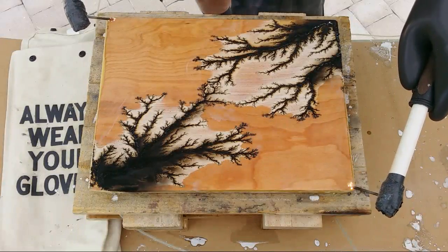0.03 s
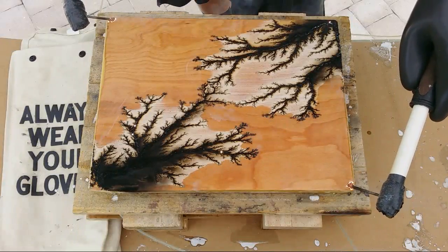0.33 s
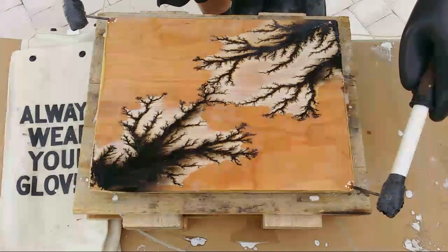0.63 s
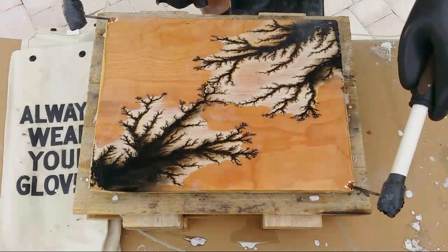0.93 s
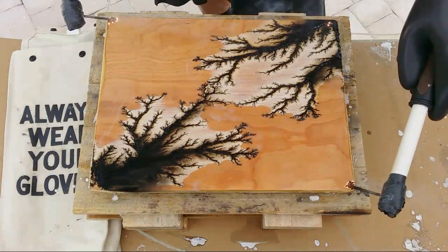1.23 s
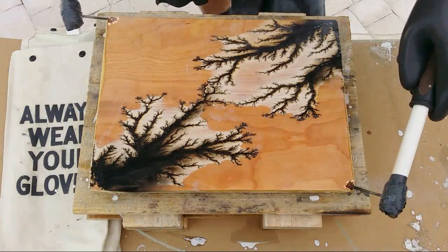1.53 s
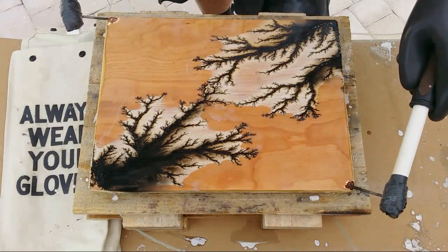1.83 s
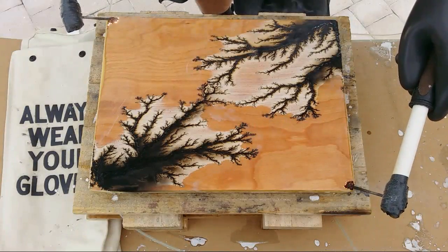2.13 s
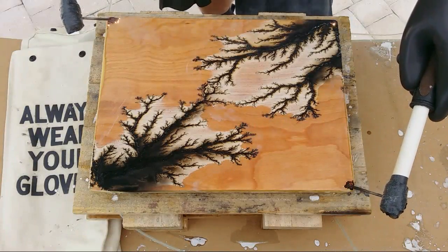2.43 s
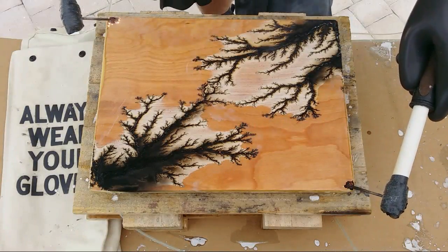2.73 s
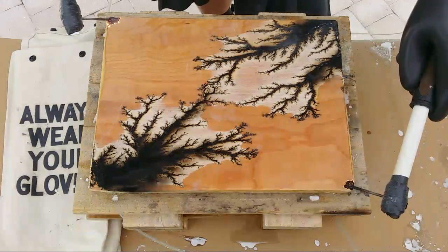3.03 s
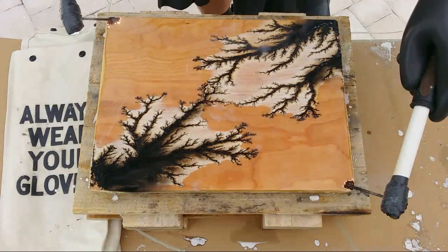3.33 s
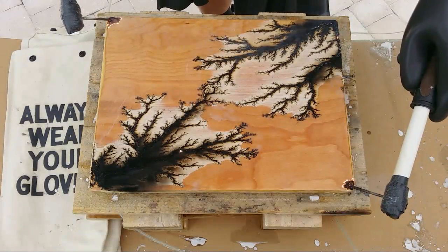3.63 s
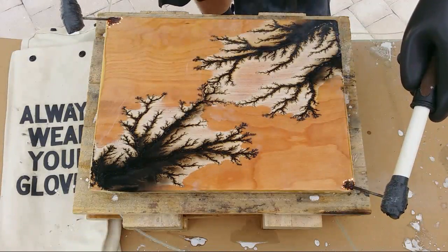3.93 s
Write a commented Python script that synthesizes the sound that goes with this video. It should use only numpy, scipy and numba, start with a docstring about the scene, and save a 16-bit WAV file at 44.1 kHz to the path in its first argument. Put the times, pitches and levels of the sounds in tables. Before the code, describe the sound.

A dense, bright, buzzing sizzle of electricity burning wood runs throughout, close by outdoors. It is loudest in the first 0.3 seconds, with flares, two sharp cracks and a brief hollow sweep. It eases around 2.5 seconds, then recovers slightly. Lone cracks come near 0.8, 2.3, 3.1 and 3.9 seconds. Underneath are a soft fan-like rush and a low transformer hum, which drops near 3 seconds after another hollow sweep.

```python
"""Outdoors near a wall, high voltage burns branching tracks into a damp plywood board close by.
Tiny sparks crowd into every half cycle of the mains, one direction of the current stronger than the
other, and make a bright buzzing sizzle with a few flares and cracks. The transformer hums at twice
the mains rate over a steady rush like that of a fan. Twice a hollow dip sweeps through the sound."""
import sys
import numpy as np
from scipy import signal
from scipy.fft import rfft, irfft
from scipy.io import wavfile
from scipy.ndimage import uniform_filter1d
from numba import njit

SR = 44100
rng = np.random.default_rng(int(sys.argv[2]) if len(sys.argv) > 2 else 0)


def wav_out(sig):
    """Save sig, one row per channel (or a flat mono array), as 16-bit PCM at SR to the path in sys.argv[1]."""
    wavfile.write(sys.argv[1], SR, np.round(np.clip(np.atleast_2d(sig).T, -1, 1) * 32767).astype(np.int16))


N = 176400

MAINS_HZ = 60
SPARKS_PER_S, SPARK_SPREAD_DB = 32000, 2.5
# The bright tone of the sparks. Each row: frequency in Hz, gain in dB.
SPARK_TONE = [(300, -27.5), (1500, -24), (3000, -22), (4300, -23.5), (5500, -17.5), (6300, -17.5),
              (7500, -12.5), (8400, -4.5), (9550, -0.5), (10300, -4), (11200, -7.5), (12200, -8.5),
              (13100, -9.5), (16500, -8.5)]


def undb(db):
    """Turn decibels into a factor to multiply by."""
    return 10 ** (np.asarray(db) / 20)


def unit(x):
    """Scale a signal to an average (rms) level of 1."""
    return x / np.sqrt(np.mean(x ** 2))


def curve(table, column=1):
    """Join one column of a time table with straight lines, one value per sample."""
    rows = np.array(table, float)
    return np.interp(np.arange(N) / SR, rows[:, 0], rows[:, column])


def colour(x, tone):
    """Filter a sound so that it takes on the given tone (rows of Hz and dB)."""
    rows, size = np.array(tone, float), 2 * N
    hz = np.maximum(np.arange(N + 1) * SR / size, 1)
    gain_db = np.interp(np.log(hz), np.log(rows[:, 0]), rows[:, 1])
    # Folding the cepstrum makes the filter ring only after a click, never before it.
    cepstrum = irfft(np.log(undb(gain_db)))
    cepstrum[1:N] *= 2
    cepstrum[N + 1:] = 0
    return irfft(rfft(x, size) * np.exp(rfft(cepstrum)))[:N]


def waver(per_s):
    """A smooth random wobble of size about 1, with per_s new values a second."""
    hold = max(int(SR / per_s), 1)
    steps = np.repeat(rng.standard_normal(N // hold + 1), hold)
    return unit(uniform_filter1d(uniform_filter1d(steps, hold), hold)[:N])


@njit
def bandpass(x, hz, width_hz):
    """Keep only the sound near hz; the centre and width may change with every sample."""
    y, band, low = np.empty(len(x)), 0., 0.
    for i in range(len(x)):
        tuning, damping = np.tan(np.pi * hz[i] / SR), width_hz[i] / hz[i]
        ring = (band + tuning * (x[i] - low)) / (1 + tuning * (tuning + damping))
        band, low = 2 * ring - band, low + 2 * tuning * ring
        y[i] = damping * ring
    return y


def echoed(x, echoes):
    """A sound plus the later, quieter copies that surfaces throw back."""
    at = np.arange(N)
    return x + sum(undb(db) * np.interp(at - np.round(ms / 1000 * SR), at, x, left=0)
                   for ms, db in echoes)


def drone(hz, width_hz):
    """A narrow band of noise becomes a tone whose pitch and strength waver quickly."""
    band = bandpass(rng.standard_normal(N), np.full(N, float(hz)), np.full(N, float(width_hz)))
    tone = np.cos(np.angle(signal.hilbert(band)))
    return unit(tone * undb(2.2 * waver(per_s=2 * width_hz)))


def fan():
    """An airy rush with a rumble, a whirr and throbbing drones; the bass drops late on."""
    # The tones of the rush and the rumble. Each row: frequency in Hz, gain in dB.
    rush_tone = [(22, -35), (38, -28), (55, -7.5), (100, -5), (200, -5), (280, -3.5), (400, 0), (560, -5),
                 (660, -2), (750, -3), (930, -5), (1050, -4), (1500, -5), (2200, -7), (3200, -10.5),
                 (4500, -13), (8000, -17.5), (16000, -49)]
    rumble_tone = [(22, -50), (38, -31), (52, -6), (72, 0.5), (95, -6), (140, -0.5), (175, 6.5),
                   (210, -2.5), (250, 2), (290, -4.5), (400, 0.5), (560, -7.5), (1000, -13), (2500, -24.5)]
    # Reflections of the rush. Each row: delay in milliseconds, gain in dB.
    echoes = [(5.3, -22), (8.9, -15)]
    # How the bass and the throb rise and fall. Each row: time in seconds, level change in dB.
    bass_changes = [(0, -20), (.04, -15), (.1, -2), (.45, 1), (1.1, -1), (1.48, 2), (1.65, -5), (1.88, 4.5),
                    (2.1, 1), (2.39, 4), (2.5, 0), (2.8, 5.5), (2.88, 4.5), (2.96, -11.5), (4, -9.5)]
    throb_changes = [(0, -7.5), (.22, 4), (.29, -1), (.36, 4.5), (.57, -1), (.65, 4), (.82, -1),
                     (.91, -6.5), (1.1, 5.5), (1.2, -5.5), (1.6, 1.5), (1.8, -1), (1.92, 3.5), (2.05, -7),
                     (2.12, 1), (2.19, -8), (2.27, 5), (2.35, -10), (2.48, 1), (2.58, -9), (2.67, 2.5),
                     (2.8, -7), (3.15, -5), (3.45, -6), (3.75, 3), (4, -3)]
    # How loud the whirr is. Each row: time in seconds, level in dB.
    whirr_levels = [(0, -51), (.3, -48.5), (.65, -46), (1, -50.5), (1.5, -46), (1.95, -50.5), (2.2, -45.5),
                    (2.6, -49.5), (3.05, -52), (3.17, -46), (3.5, -52), (3.78, -49), (3.95, -44.5)]
    # Each row: a drone's pitch in Hz, width in Hz, base level in dB, then how closely it follows
    # the bass and the throb, each from 0 to 1.
    resonances = [(337.2, 14, -44.5, 0.5, 0.86), (362.5, 16, -50, 0.5, 0.9), (479, 10, -56.5, .4, 0.1),
                  (818, 14, -55, .1, 0.1), (1150, 22, -56, 0, 0.1)]
    bass_db, throb_db = curve(bass_changes), curve(throb_changes)
    air = unit(echoed(colour(rng.standard_normal(N), rush_tone), echoes))
    rush = air * undb(-38.5 + .53 * waver(per_s=6.17))
    rumble = unit(colour(rng.standard_normal(N), rumble_tone)) * undb(-45 + bass_db)
    whirr = undb(curve(whirr_levels)) * drone(hz=722, width_hz=30)
    drones = sum(undb(db + bass_share * bass_db + throb_share * throb_db) * drone(hz, width_hz)
                 for hz, width_hz, db, bass_share, throb_share in resonances)
    return rush + rumble + whirr + drones


def transformer():
    """The core hums at twice the mains rate, with weaker wavering tones above."""
    # How loud the hum is. Each row: time in seconds, level in dB.
    hum_levels = [(0, -45), (.035, -45), (.09, -37), (.23, -34.5), (.33, -38.5), (.48, -37), (.7, -39.5),
                  (.9, -39), (1.1, -37), (1.2, -41), (1.33, -39.5), (1.55, -38.5), (1.85, -41), (2.1, -41),
                  (2.2, -42.5), (2.5, -42), (2.6, -40.5), (2.72, -45.5), (2.85, -40.5), (2.93, -48.5),
                  (3.35, -49), (3.7, -45.5), (4, -47.5)]
    # The tones in the hum. Each row: multiple of the mains rate, relative level in dB.
    harmonics = [(2, 0), (3, -21), (4, -16), (6, -13.5)]
    phase = 2 * np.pi * MAINS_HZ * np.arange(N) / SR
    hum = np.zeros(N)
    for multiple, db in harmonics:
        strength = undb(db + .6 * waver(per_s=16))
        hum += strength * np.sin(multiple * phase + 2 * np.pi * rng.random())
    return np.sqrt(2) * hum * undb(curve(hum_levels))


def yard(sound):
    """The wall and nearby surfaces return echoes; the rest of the yard scatters a short, soft tail."""
    # Each row: an echo's delay in milliseconds, gain in dB.
    echoes = [(6.68, -25), (7.76, -17.5), (10.15, -24)]
    tail_db, fade_s = -10, .12  # the tail falls by 60 dB in fade_s
    t = np.arange(SR // 5) / SR
    tail = rng.standard_normal(len(t)) * np.exp(-np.log(1000) * t / fade_s)
    scattered = signal.fftconvolve(sound, tail / np.linalg.norm(tail))[:N]
    return echoed(sound, echoes) + undb(tail_db) * scattered


def sparks(per_s, spread_db):
    """Each spark is one click at a random moment; many are small and a few are larger."""
    happens = rng.random(N) < per_s / SR
    size = undb(spread_db * np.minimum(rng.exponential(size=N), 5))
    return unit(happens * size * np.sign(rng.standard_normal(N)))


def flares():
    """The arc jumps harder on some voltage peaks, giving short, dense showers of sparks."""
    # Each row: a flare's middle in seconds, level in dB.
    showers = [(.0237, -14.5), (.0398, -20), (.0561, -13), (.0735, -23), (0.0903, -17), (0.1071, -17),
               (0.1402, -20), (0.173, -16), (0.2225, -21), (.2562, -22), (0.2731, -19), (.3397, -23),
               (.5735, -24), (.6729, -24), (.7726, -23), (.9733, -23), (1.1562, -23), (1.3903, -25),
               (1.7074, -24), (1.7402, -26), (2.2826, -26), (2.2993, -24.5), (2.3825, -28), (2.399, -27),
               (2.4156, -23.5), (2.5989, -30), (3.04, -25), (3.0909, -25), (3.425, -23), (3.925, -22)]
    # Flares have more body than the sizzle. Each row: frequency in Hz, gain in dB.
    flare_tone = [(300, -17.5), (1200, -12.5), (3000, -15.5), (4500, -17.5), (6300, -15.5), (7500, -9),
                  (8400, -3.5), (9500, 4), (11000, -8.5), (13000, -8.5), (16500, -9.5)]
    t, width_ms = np.arange(N) / SR, .75
    swell = sum(undb(db) * np.exp(-.5 * ((t - at) * 1000 / width_ms) ** 2) for at, db in showers)
    return swell * unit(colour(sparks(SPARKS_PER_S, SPARK_SPREAD_DB), flare_tone))


def cracks():
    """Lone loud sparks, each one sharp click with the tone of the sizzle."""
    # Each row: a crack's start in seconds, peak level in dB.
    lone_sparks = [(.0242, -7), (0.107, -4), (.8052, -13), (2.316, -17), (2.4158, -18), (3.0401, -18),
                   (3.1909, -17), (3.8572, -8), (3.9252, -14.5)]
    hits = np.zeros(N)
    for at, db in lone_sparks:
        hits[int(at * SR)] = undb(db)
    click_peak = np.abs(colour(signal.unit_impulse(N), SPARK_TONE)).max()
    return colour(hits, SPARK_TONE) / click_peak


def bursts(delay_ms, fall_ms):
    """Spark power for one direction of the current: one slightly uneven swell per mains cycle."""
    jitter_ms, spread_db = .15, .74
    cycles = (np.arange(N) / SR - delay_ms / 1000) * MAINS_HZ
    nearest = np.round(cycles).astype(int)
    chance = rng.standard_normal((N // 100, 2))[nearest + 2]  # two random numbers per cycle
    from_peak_ms = (cycles - nearest) / MAINS_HZ * 1000 + jitter_ms * chance[:, 0]
    width_ms = fall_ms * np.where(from_peak_ms < 0, .58, 1)  # it rises faster than it falls
    swell = np.exp(-.5 * (from_peak_ms / width_ms) ** 2)
    return swell * undb(spread_db * chance[:, 1]) ** 2


def arc():
    """Sizzling sparks and sharper snaps crowd around the voltage peaks, joined by flares and cracks."""
    # The arc's strength. Each row: time in seconds, base level in dB, lead in dB of the usually
    # stronger direction of the current over the other.
    strength = [(0, -23, 0), (.05, -23, 3.5), (.19, -23, 1), (.33, -27.5, 2), (.45, -27, -2),
                (.66, -26.5, 1), (1, -27.5, 1.5), (1.25, -27.7, 4.5), (1.45, -29, 0), (1.66, -28.5, 1.5),
                (1.74, -28.5, 5), (1.85, -29, 2.5), (2.1, -29.9, 2), (2.22, -32, 0), (2.3, -29.5, 1),
                (2.46, -33.5, -2.5), (2.74, -33.5, 1), (2.82, -32.3, 3), (3, -31, 0), (3.08, -31.5, 2),
                (3.45, -29.5, 2), (3.7, -29, 2), (4, -30, 2.5)]
    # When the strong burst peaks in the mains cycle. Each row: time in seconds, delay in milliseconds.
    burst_delays = [(0, 6.1), (.2, 6), (.45, 5.8), (1.5, 6.4), (2.1, 7.4), (2.5, 7), (3.1, 7.4), (4, 7.5)]
    # Steady frying between bursts. Each row: time in seconds, level in dB relative to their peaks.
    frying = [(0, -9), (.25, -11.5), (.45, -8), (1.7, -8), (2.2, -8.5), (2.45, -5.5), (2.75, -7), (3.1, -9),
              (4, -9)]
    # The sharp tone of the snaps. Each row: frequency in Hz, gain in dB.
    snap_tone = [(500, -7), (2500, -13), (5000, -15.5), (9000, -14), (12000, 0.5), (17000, 3)]
    delay_ms, lead = curve(burst_delays), undb(curve(strength, column=2))
    strong = bursts(delay_ms, fall_ms=1.53) * lead
    weak = bursts(delay_ms + 8.36, fall_ms=1.6) / lead  # about half a cycle later
    drive = unit(np.sqrt(strong + weak + undb(curve(frying)) ** 2))
    sizzle = unit(colour(drive * sparks(SPARKS_PER_S, SPARK_SPREAD_DB), SPARK_TONE))
    snaps = unit(colour(drive ** 2 * sparks(per_s=1500, spread_db=.5), snap_tone))
    loudness = undb(curve(strength) + .38 * waver(per_s=9.2))
    return (undb(.5) * sizzle + undb(-19.5) * snaps) * loudness + flares() + cracks()


def scene():
    """The arc in its yard, the transformer and the fan, together in one channel."""
    return (yard(arc()) + transformer() + fan())[None]


def record(dry):
    """A hollow dip sweeps up and later down; the deepest bass and the highest treble are cut."""
    # The dip's path. Each row: time in seconds, centre in Hz, depth from 0 to 1.
    dip = [(0, 800, 0), (.045, 900, 0), (.075, 1300, .8), (.13, 2600, 0.67), (.19, 3770, 0.6),
           (.3, 4450, 0.08), (2.6, 4900, 0), (2.77, 3700, .45), (2.87, 2300, .78), (2.915, 1200, .75),
           (2.945, 800, 0)]
    centre_hz, depth = curve(dip), curve(dip, column=2)
    hollow = dry[0] - depth * bandpass(dry[0], centre_hz, .53 * centre_hz)
    low_hz, top_hz = 44, 17000
    bass_cut = signal.butter(4, low_hz, "high", fs=SR, output="sos")
    treble_cut = signal.ellip(12, .1, 80, top_hz, fs=SR, output="sos")
    return signal.sosfilt(treble_cut, signal.sosfilt(bass_cut, hollow))[None]


dry = scene()
out = record(dry)
wav_out(out)
```